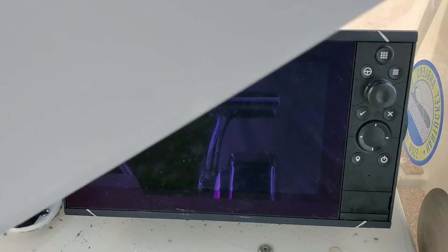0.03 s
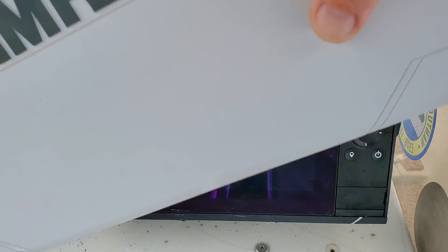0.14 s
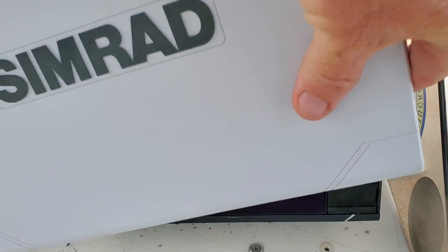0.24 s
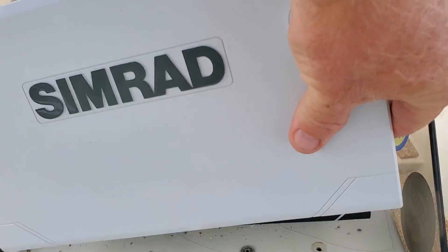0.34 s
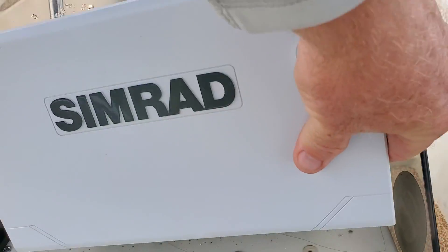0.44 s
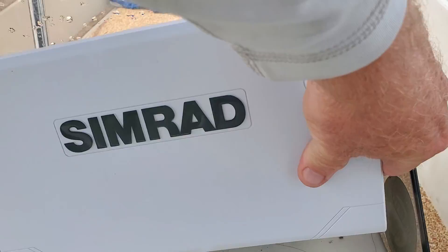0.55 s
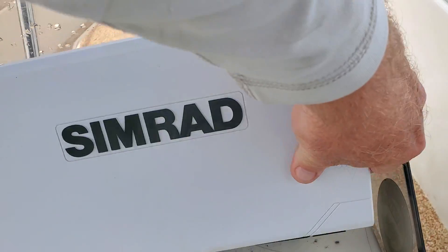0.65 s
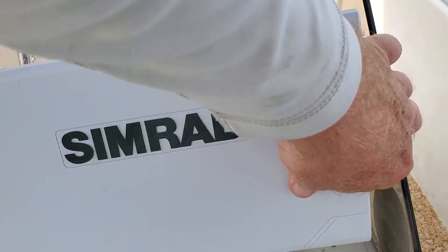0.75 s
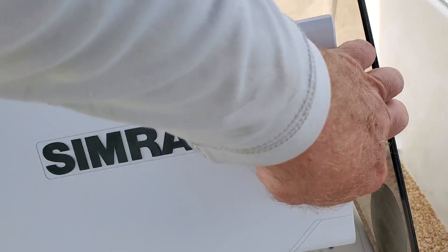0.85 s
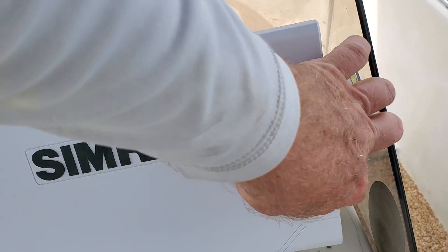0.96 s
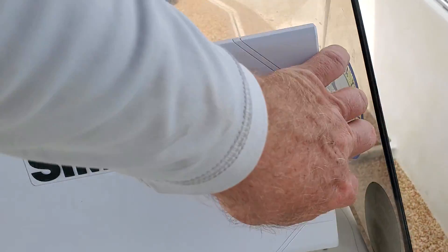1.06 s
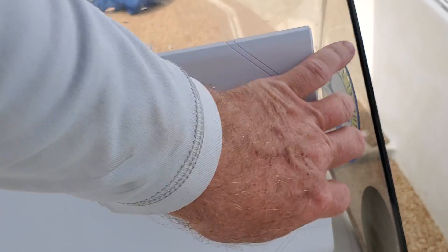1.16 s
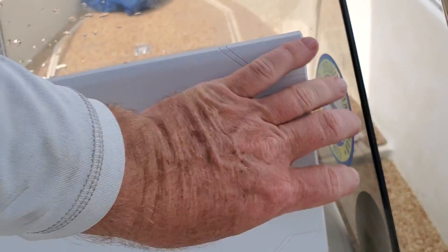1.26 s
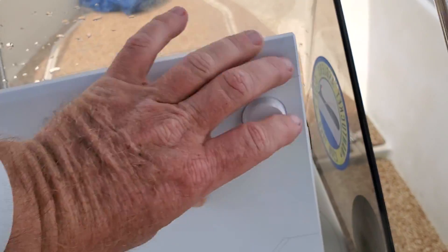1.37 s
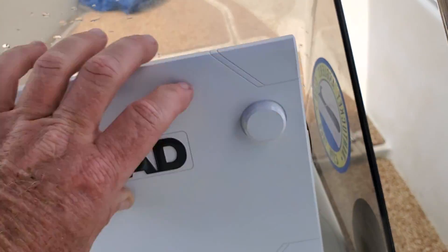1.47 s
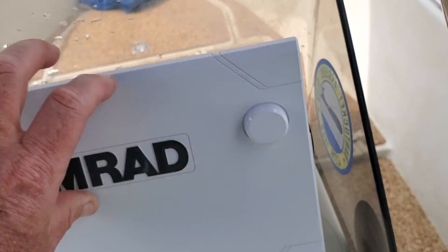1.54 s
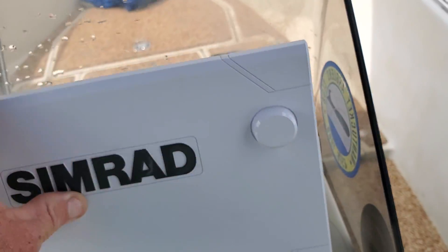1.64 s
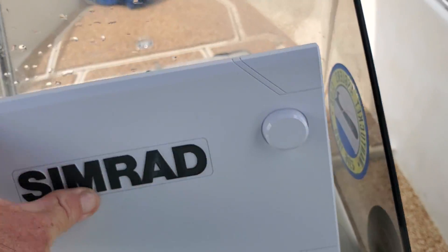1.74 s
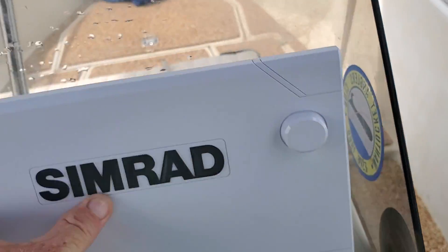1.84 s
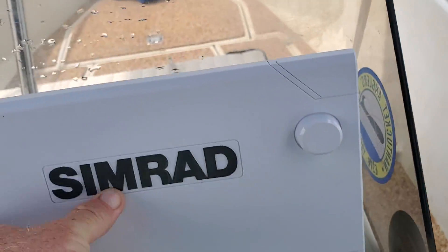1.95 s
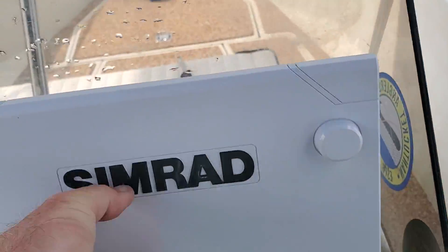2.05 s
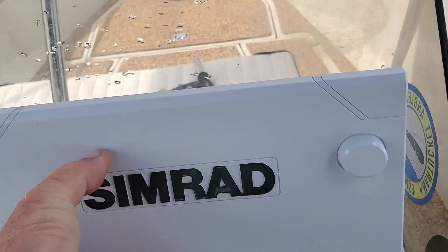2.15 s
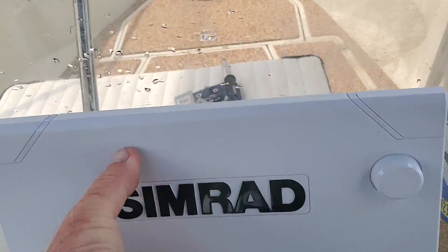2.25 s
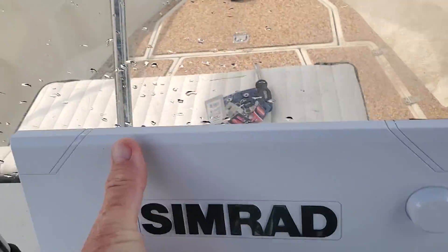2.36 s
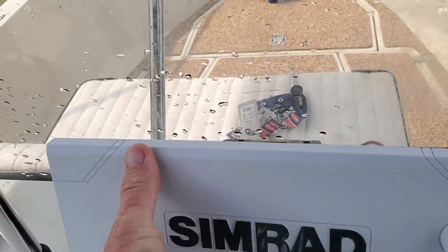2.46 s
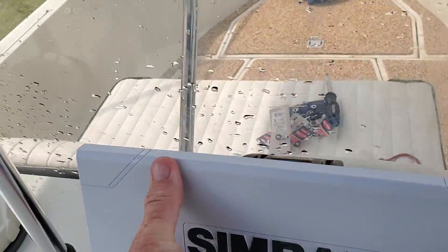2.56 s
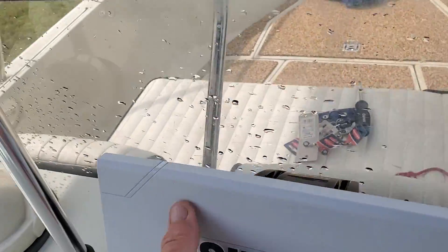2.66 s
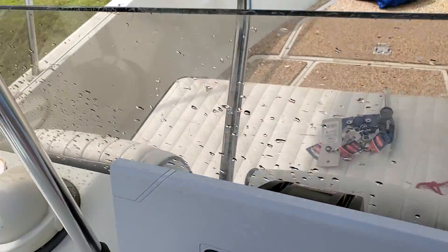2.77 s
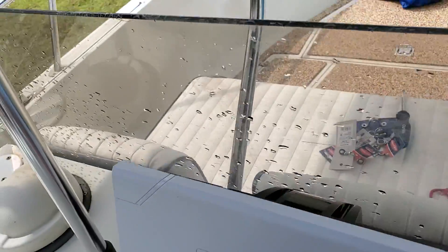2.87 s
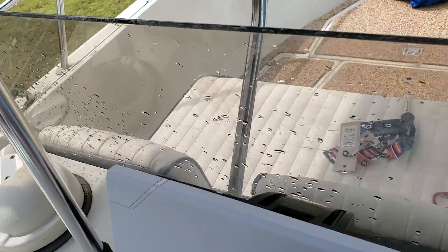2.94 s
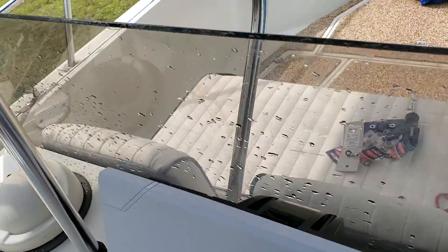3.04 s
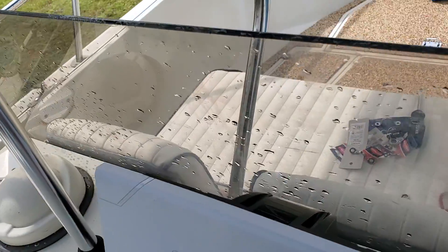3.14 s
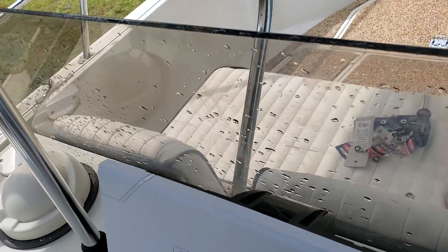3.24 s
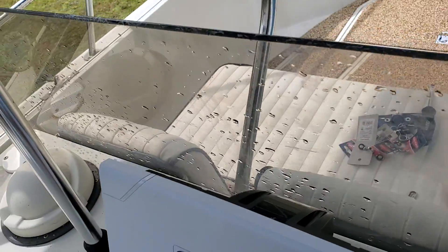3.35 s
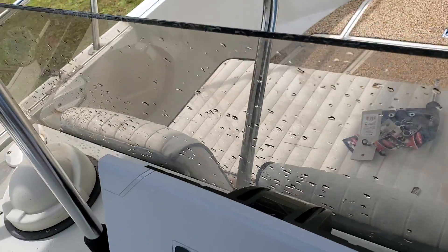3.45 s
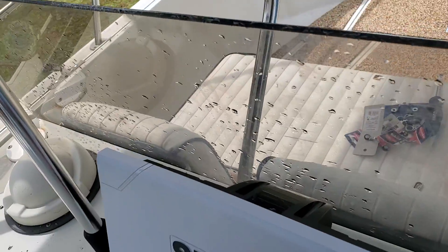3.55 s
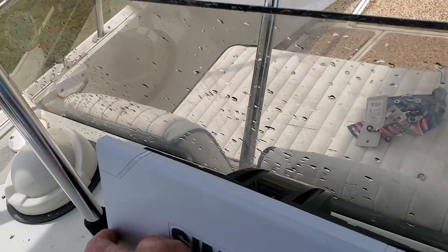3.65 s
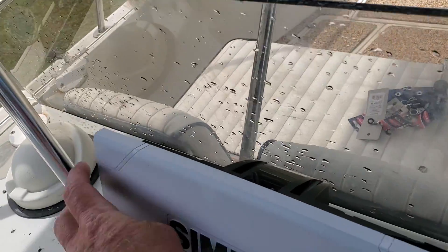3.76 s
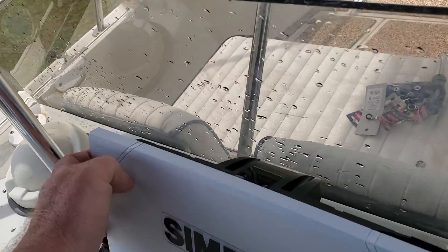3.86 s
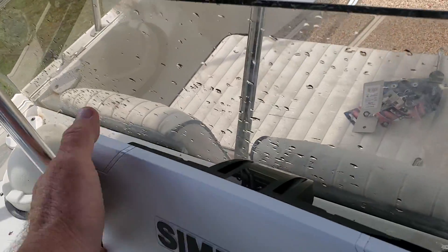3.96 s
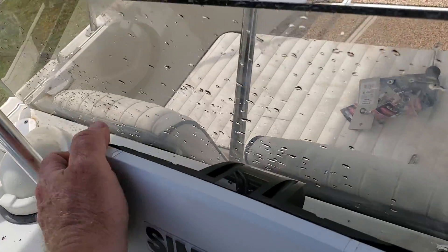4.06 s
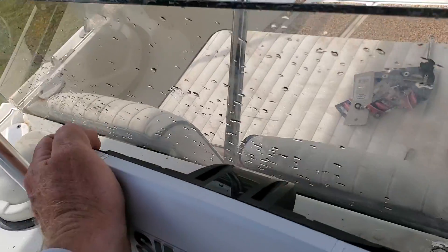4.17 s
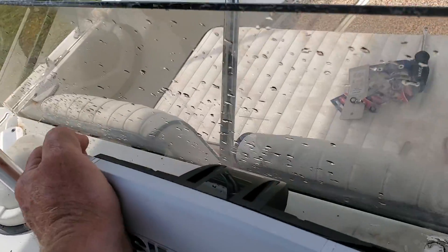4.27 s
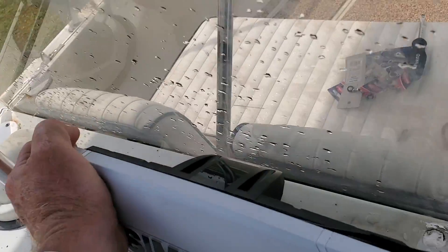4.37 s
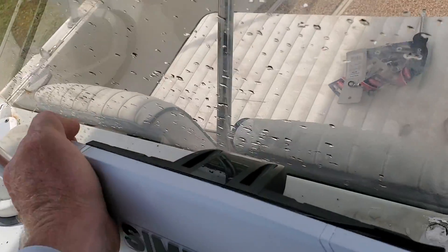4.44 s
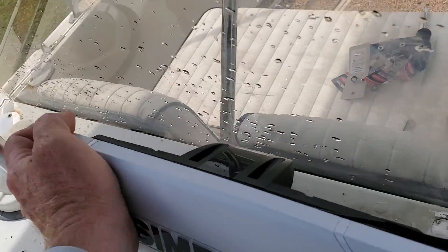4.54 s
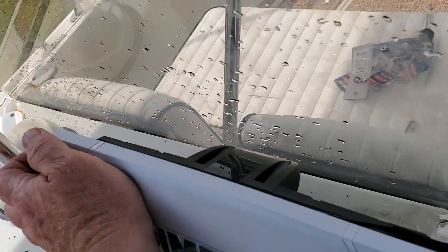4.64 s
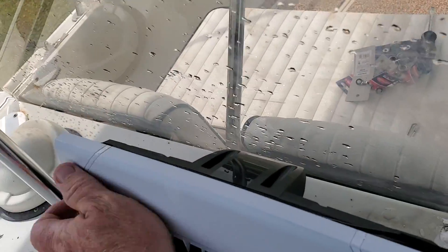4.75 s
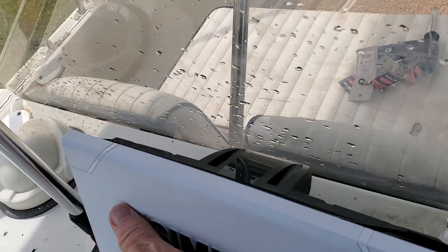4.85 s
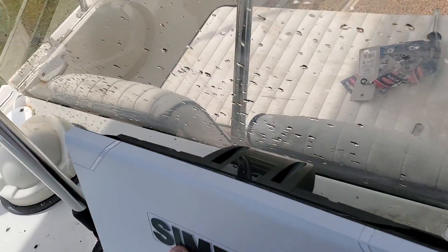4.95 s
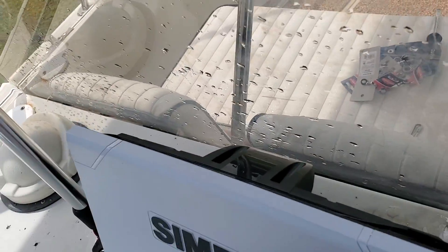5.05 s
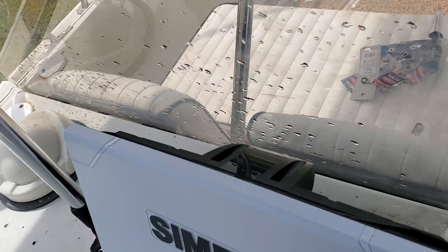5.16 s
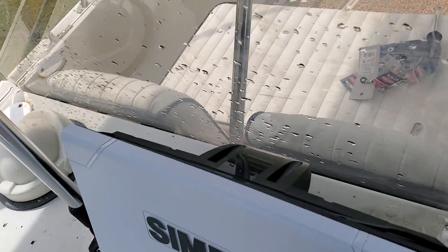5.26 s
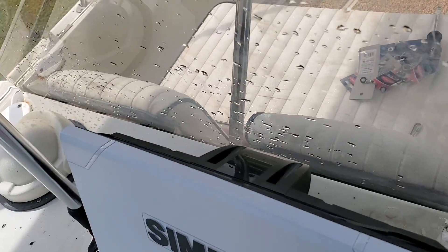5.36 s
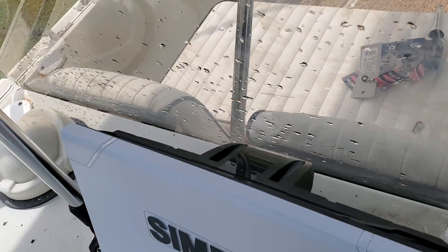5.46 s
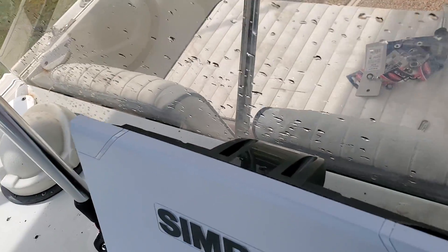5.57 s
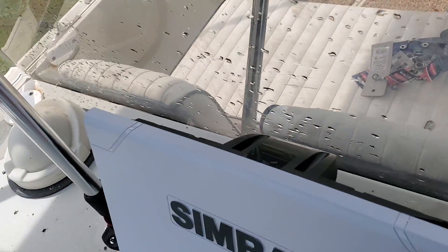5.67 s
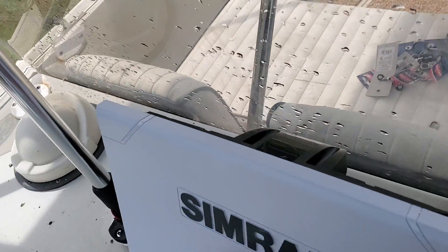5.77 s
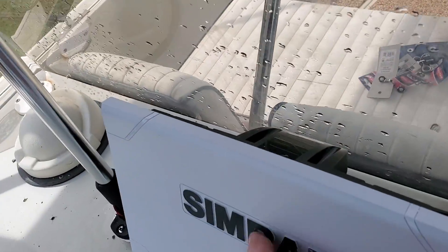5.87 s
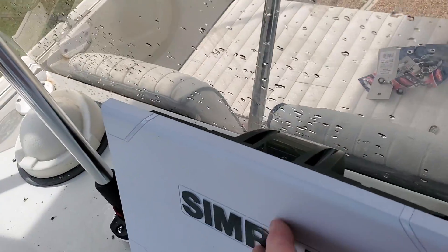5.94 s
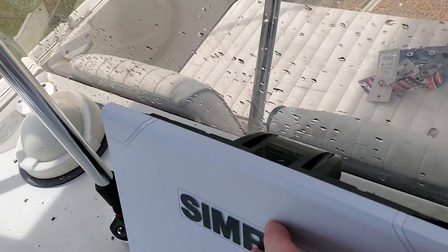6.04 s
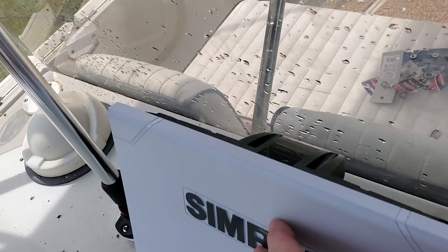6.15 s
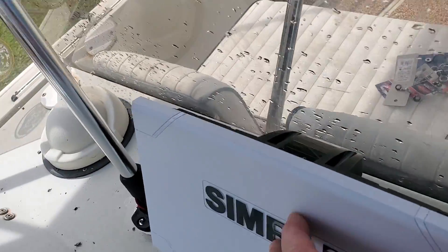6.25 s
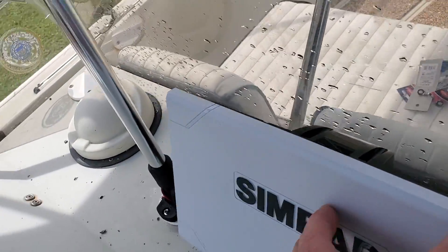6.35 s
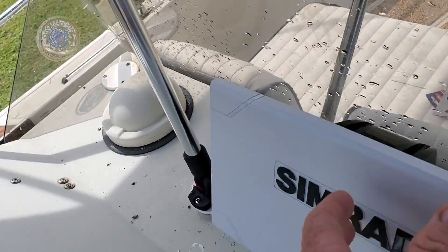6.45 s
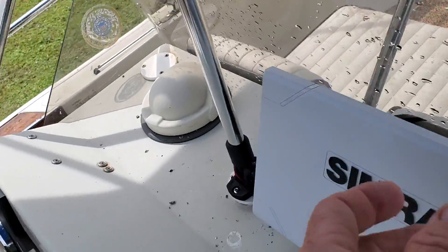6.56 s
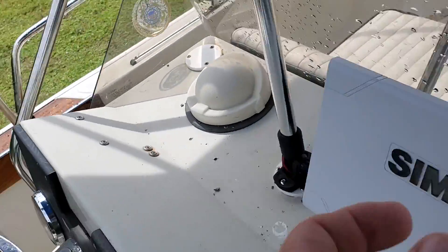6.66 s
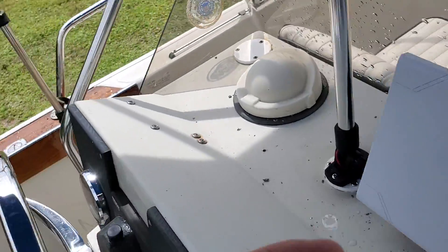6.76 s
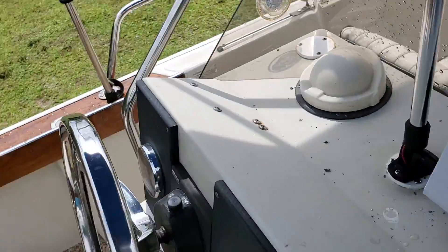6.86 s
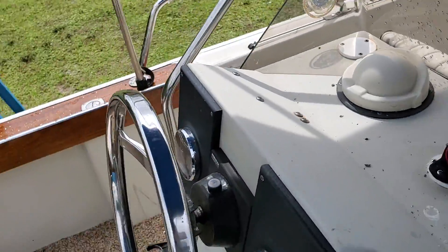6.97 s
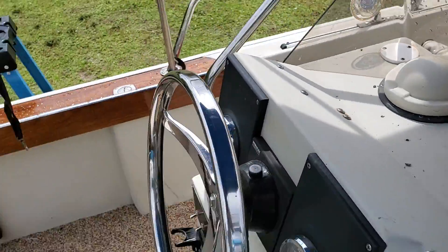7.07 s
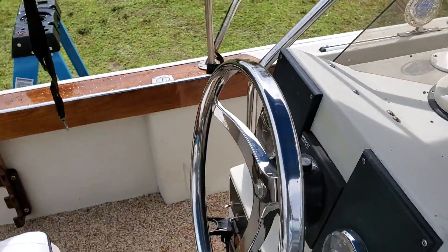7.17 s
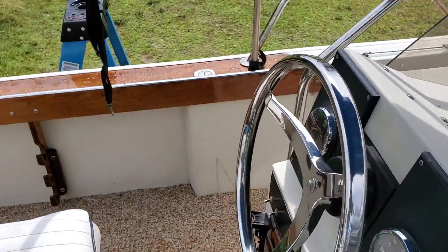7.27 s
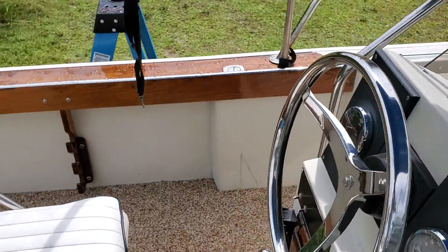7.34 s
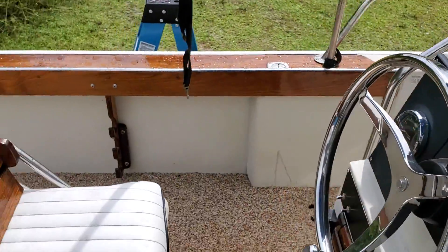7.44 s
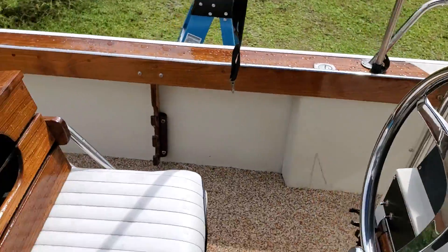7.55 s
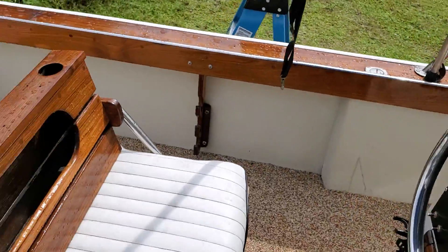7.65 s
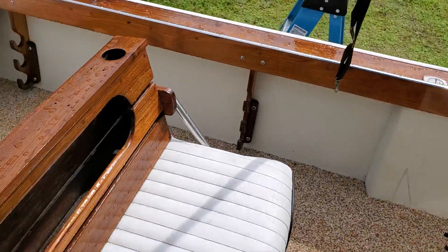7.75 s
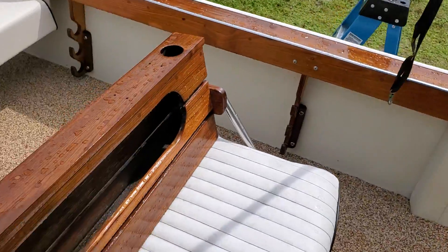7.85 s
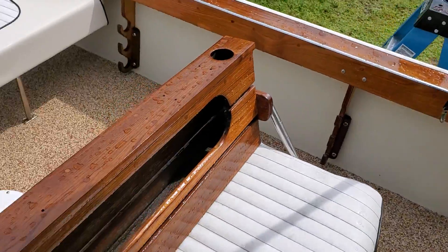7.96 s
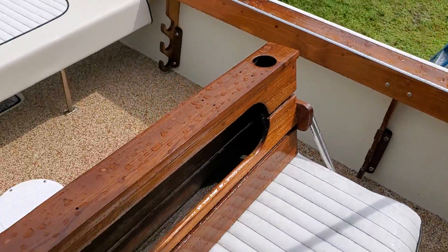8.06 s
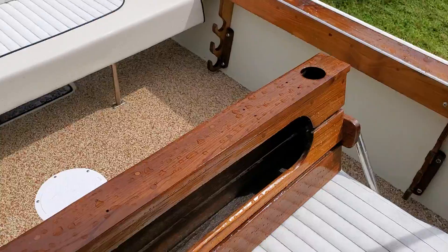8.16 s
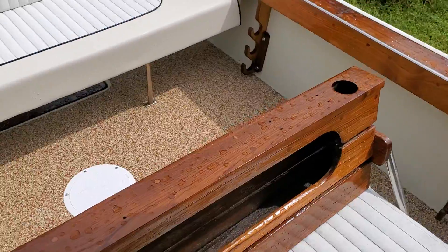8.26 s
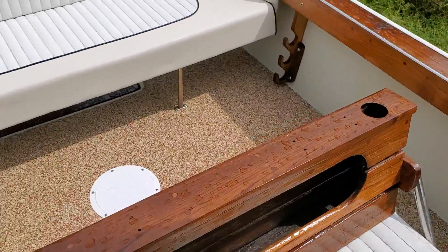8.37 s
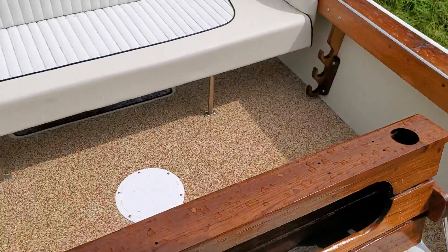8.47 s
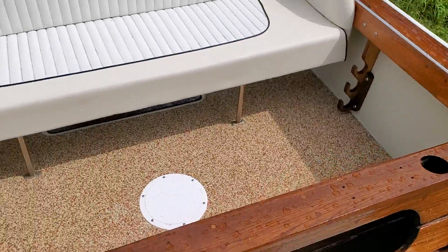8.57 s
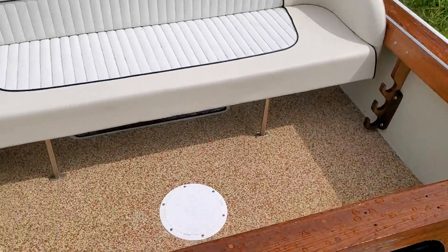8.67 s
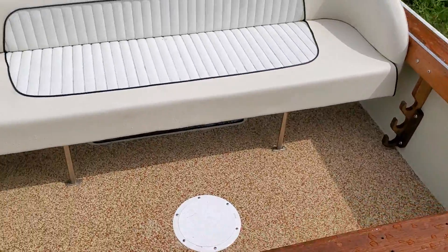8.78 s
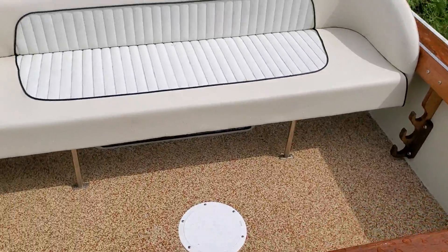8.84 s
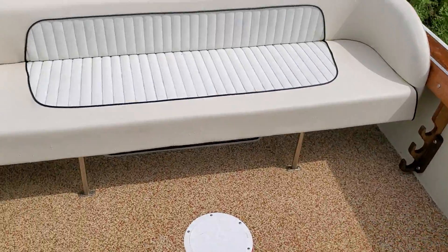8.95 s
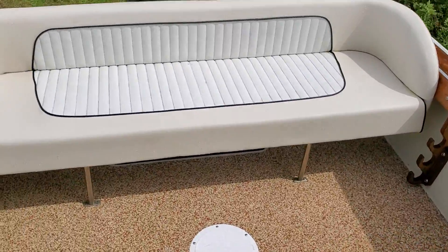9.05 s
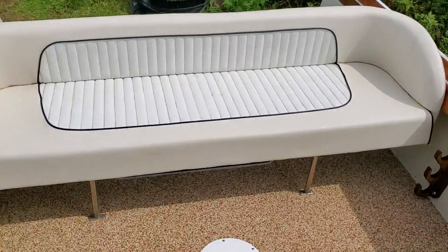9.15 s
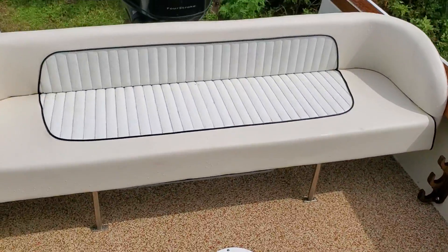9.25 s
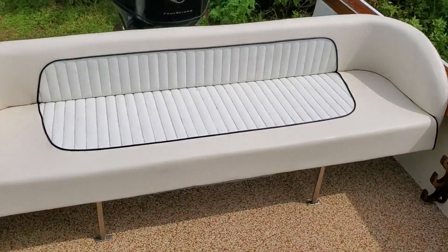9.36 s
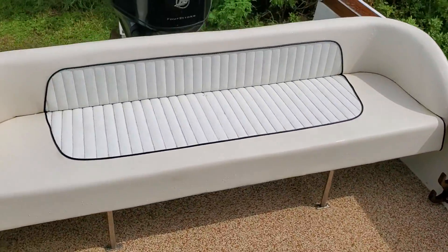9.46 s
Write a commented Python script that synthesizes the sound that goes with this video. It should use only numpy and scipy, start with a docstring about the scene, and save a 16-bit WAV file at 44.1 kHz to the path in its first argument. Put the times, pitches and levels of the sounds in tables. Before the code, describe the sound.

Close to the microphone, hands press a thin plastic cover onto a display on an open boat. A clack at 0.5 seconds leads into a quick cluster of clacks and rim scraping, loudest at 1 second with a sharp rub and a hollow boom from the console. Another knock and a fainter, slightly whistling scrape follow around 1.4 seconds. From 2 to 5 seconds come lighter, irregular taps and thumps over a low shaking rumble, with skin and sleeve sliding and a few tiny bright snaps. Two firm clacks land at about 5.4 and 5.6 seconds, and smaller ones near 6. The handling then dies away. After a faint knock at 7.2 seconds, clothing rustles on the left and returns to the centre as the person turns. A distant bird gives short, faint whistles from 8 to 9 seconds. Quiet, far traffic rumbles throughout.

```python
"""Pressing a cover onto a boat's display

Hands press a plastic cover onto the console display: its thin shell clacks, its rim scrapes,
and each push booms in the hollow console. Sliding skin rustles and snaps.
Then the person turns about the deck, cloth rustling, over distant traffic rumble and a far bird."""
import sys
import numpy as np
from scipy import signal
from scipy.io import wavfile
from scipy.ndimage import uniform_filter1d

SR = 44100
rng = np.random.default_rng(int(sys.argv[2]) if len(sys.argv) > 2 else 0)


def pcm_store(signal):
    """Save signal as 16-bit PCM."""
    levels = np.round(np.clip(np.atleast_2d(signal), -1, 1) * 32767)
    wavfile.write(sys.argv[1], SR, levels.astype(np.int16).T)


N = 419391


def gain_of(db):
    return 10 ** (np.asarray(db) / 20)


def evened(x):
    """Scale a signal to an average power of one."""
    return x / np.sqrt(np.mean(x ** 2) + 1e-20)


def add(mix, start, sound):
    """Mix a sound in, starting at a time in seconds."""
    part = mix[..., round(start * SR):][..., :sound.shape[-1]]
    part += sound[..., :part.shape[-1]]


def ring(x, modes):
    """Let x ring an object's natural tones (modes), given as f/Hz, width/Hz, level/dB."""
    return sum((-1) ** k * gain_of(db) * signal.lfilter(*signal.iirpeak(hz, hz / width, SR), x)
               for k, (hz, width, db) in enumerate(modes))


def grainy(spread_db, size):
    """Short random jumps in level."""
    return evened(gain_of(spread_db * evened(uniform_filter1d(rng.standard_normal(N), size=size))))


# how alike left and right sound: f/Hz, likeness from 0 to 1
LIKENESS = [(100, 0.86), (300, 0.81), (700, 0.16), (3000, 0.0078)]
def noise(spectrum, patchy_db, size=10):
    """Stereo noise with drifting louder and softer patches; both sides are alike in the bass."""
    log_hz = np.log(np.fft.rfftfreq(1024, 1 / SR) + 1)
    def curve(points):
        hz, values = np.transpose(points)
        return np.interp(log_hz, np.log(hz + 1), values)[:, None]
    a, b, c, d, patches = rng.standard_normal((N // 256 + 5, 513, 5)).T
    patches = evened(uniform_filter1d(uniform_filter1d(patches, size, axis=0), size, axis=1))
    alike = curve(LIKENESS)
    left = a + 1j * b
    right = alike * left + np.sqrt(1 - alike ** 2) * (c + 1j * d)
    shaped = np.array([left, right]) * gain_of(curve(spectrum) + patchy_db * patches)
    return evened(signal.istft(shaped, nperseg=1024, noverlap=768)[1][:, :N])


# tone colour of traffic and leaves: f/Hz, relative level/dB
OUTDOOR_SPECTRUM = [(22, -42.5), (45, -6), (65, 6.5), (130, -10), (500, -20), (900, -32), (1600, -70.5),
                    (3200, -31.5), (4600, -52.5), (16000, -56)]
# tones of the hum: f/Hz, filter width/Hz, level/dB
HUM_TONES = [(59.88, 3.1, -55.5), (237, 3.3, -68), (378.6, 14, -70)]
def outdoors():
    """Far traffic rumbles, leaves hiss, and narrow bands of noise make a wavering hum."""
    hum = 0
    for hz, width, db in HUM_TONES:
        band = [(hz, width, 0)]
        hum += gain_of(db) * evened(ring(ring(rng.standard_normal(N), band), band))
    return gain_of(-53.5) * noise(OUTDOOR_SPECTRUM, patchy_db=2.5) + hum


# the bird's song: t/s, level/dB, f/Hz
BIRD_NOTES = [(8.075, -63, 2430), (8.113, -61, 3120), (8.399, -64.5, 3420), (8.665, -65, 2465),
              (8.797, -60.5, 3030), (8.848, -62, 2275), (8.924, -52, 2920), (8.98, -59.5, 2170),
              (9.076, -48, 2840), (9.132, -53, 2146)]
def bird():
    """Short gliding whistles, blurred by distance."""
    note_s, flat_hz, droop = 0.062, 1906, 0.364  # the higher above flat_hz, the more a note slides down
    out, t = np.zeros((2, N)), np.arange(0, note_s, 1 / SR)
    for start, db, hz in BIRD_NOTES:
        waver = 0.01 * evened(uniform_filter1d(rng.standard_normal((2, len(t))), size=100))
        pitch = hz * (1 + waver) - droop * (hz - flat_hz) * (np.sqrt(t / note_s) - .7)
        cycles = np.cumsum(pitch, axis=1) / SR + rng.random((2, 1))
        add(out, start, gain_of(db) * np.sin(2 * np.pi * cycles) * signal.windows.tukey(len(t), .6))
    echoes = rng.standard_normal((2, 4000)) * gain_of(-60 * np.arange(4000) / SR / 0.18)
    return out + gain_of(-29.5) * signal.oaconvolve(out, echoes, axes=1)[:, :N]  # off trees and hulls


# a faint, very high hiss: t/s, length/s, level/dB
FAINT_HIGH_HISS = [(4.201, 0.31, -59)]
def faint_hiss():
    """A faint, very high hiss, like a soft breath through the nose."""
    out, band = np.zeros((2, N)), [(13000, 4600, 0)]
    for start, length, db in FAINT_HIGH_HISS:
        size = round(length * SR)
        hiss = evened(ring(ring(rng.standard_normal((2, SR // 2)), band), band))
        hiss *= grainy(1.5, size=200)[:SR // 2]
        add(out, start, gain_of(db) * np.hanning(size) ** .5 * hiss[:, :size])
    return out


# light touch between strokes: t/s, level/dB
LIGHT_TOUCH = [(0, -75.5), (1.8, -59.5), (6.1, -60), (7, -79.5), (9.51, -64.5)]
# hand and sleeve strokes: peak t/s, swell/s, fade/s, level/dB, relative hiss/dB,
# shape (1 is pointed, 5 is flat with sudden ends)
HAND_STROKES = [(0.106, 0.022, 0.041, -45, -14, 0.77), (0.59, 0.094, 0.056, -54, -9, 1.3),
                (0.898, 0.17, 0.25, -40.5, -15, 1.7), (1, 0.049, 0.0091, -16, -27, 0.65),
                (1.429, 0.17, 0.16, -47, -13, 6.6), (2.33, 0.37, 0.29, -42.5, -10, 1.27),
                (2.536, 0.068, 0.021, -46, -13.5, 5), (2.929, 0.077, 0.081, -42.5, -17, 1.8),
                (3.351, 0.03, 0.03, -46, -11, 3.9), (3.527, 0.04, 0.2, -44.5, -11.5, 1.2),
                (3.874, 0.047, 0.028, -37, -11.5, 2), (4.128, 0.1, 0.22, -40, -15, 0.57),
                (4.799, 0.17, 0.39, -33.5, -10, 0.38), (5.12, 0.02, 0.057, -42, -22, 3.9),
                (5.889, 0.15, 0.12, -36.5, -12.5, 2), (6.42, 0.81, 0.87, -54.5, -16, 1.17),
                (7.304, 0.022, 0.05, -50, -16, 1.3), (7.438, 0.093, 0.075, -39, -18.5, 1.14),
                (7.8, 0.56, 0.39, -47, -12.5, 0.62), (9.118, 0.39, 0.2, -60.5, -43, 3.7)]
def stroke_levels():
    """Each stroke swells and fades; returns how strong the rub and the fine hiss are over time."""
    drop_db = 20.5  # level lost one swell or fade time from the peak
    t = np.arange(N) / SR
    rub_power = gain_of(np.interp(t, *np.transpose(LIGHT_TOUCH))) ** 2
    hiss_power = rub_power * gain_of(-13.5) ** 2
    for peak, swell, fade, db, hiss_db, shape in HAND_STROKES:
        near = slice(max(round((peak - 3 * swell) * SR), 0), round((peak + 3 * fade) * SR))
        away = np.where(t[near] < peak, (peak - t[near]) / swell, (t[near] - peak) / fade)
        power = gain_of(db - drop_db * away ** shape) ** 2
        rub_power[near] += power
        hiss_power[near] += power * gain_of(hiss_db) ** 2
    return np.sqrt(rub_power), np.sqrt(hiss_power)


# clear snaps of skin: t/s, level/dB
CLEAR_SNAPS = [(2.315, -33), (3.279, -37), (4.223, -32), (4.591, -44), (5.269, -42), (5.292, -58),
               (5.308, -40), (5.317, -35)]
def skin_snaps():
    """Sticking skin lets go with tiny bright snaps: a few clear ones, and fine grit under each stroke."""
    grit_db, grit_per_s = -15, 48
    kicks = np.zeros(N)
    times, db = np.transpose(CLEAR_SNAPS)
    kicks[np.round(times * SR).astype(int)] = gain_of(db)
    rub_level, _ = stroke_levels()
    grit = rub_level * gain_of(grit_db + 4.7 * np.minimum(rng.exponential(1, N), 2))
    kicks += grit * (rng.random(N) < grit_per_s / SR)
    snaps = rng.standard_normal((8, 2, 400)) * gain_of(-60 * np.arange(400) / SR / 0.016)
    snaps = signal.lfilter(*signal.butter(1, 3000, "high", fs=SR), snaps)
    choice = rng.integers(0, len(snaps), N)
    return sum(signal.oaconvolve((kicks * (choice == k))[None], snap, axes=1)[:, :N]
               for k, snap in enumerate(snaps))


# tone colours of the rub and of its fine hiss: f/Hz, relative level/dB
RUB_SPECTRUM = [(410, -9), (700, -17.5), (1110, -12.5), (2000, -10.5), (2580, -6), (6000, -27),
                (13200, -120)]
HISS_SPECTRUM = [(2940, -43), (5000, -14.5), (8620, 5), (13900, 1.5), (16000, -5)]
def rubbing():
    """Sliding skin and cloth catch and rustle, and make the cover ring a little."""
    rub_level, hiss_level = stroke_levels()
    rub = noise(RUB_SPECTRUM, patchy_db=2.6, size=16)
    rub = evened(rub + gain_of(-5.5) * evened(ring(rub, COVER_MODES)))
    hiss = noise(HISS_SPECTRUM, patchy_db=.8) * gain_of([[-1.2], [1.2]])  # a little to the right
    return grainy(1.5, size=500) * (rub_level * rub + hiss_level * hiss)


# how hard the console shakes: t/s, level/dB
SHAKE_LEVELS = [(0.0, -59), (1.06, -47.5), (1.19, -53.5), (6.16, -47), (6.64, -63.5), (9.5, -85.5)]
def shaking():
    """The hands shake the console, so its walls and the air inside rumble."""
    jiggle = rng.standard_normal(N)
    air = evened(ring(jiggle, CONSOLE_AIR_MODES))
    walls = evened(ring(jiggle * grainy(4.3, size=600), WALL_MODES))
    level = gain_of(np.interp(np.arange(N) / SR, *np.transpose(SHAKE_LEVELS)))
    return level * (air + gain_of(-3.5) * walls)


def dulled(x):
    """The soft plastic gives off little treble."""
    return signal.lfilter(*signal.butter(2, 4300, fs=SR), x)


# the cover's rim scraping the display frame: t/s, length/s, level/dB,
# pitch factor at the start, pitch factor at the end, roughness/dB, whistle boost/dB
RIM_SCRAPES = [(0.699, 0.35, -37.5, 0.9, 0.9, 4, 3), (1.337, 0.275, -45.5, 1.03, 1.11, -1, 10)]
def scrapes():
    """The rim sticks and slips, ringing the shell; two tones stand out and shift as the cover seats."""
    out, size_limit = np.zeros((2, N)), SR // 2
    held_modes = np.array(COVER_MODES) * [1, 3.5, 1]  # the hand damps the tones, which widens them
    for start, length, db, first, last, rough_db, whistle_db in RIM_SCRAPES:
        size = round(length * SR)
        slips, other = rng.standard_normal((2, size_limit)) * grainy(rough_db, size=500)[:size_limit]
        grind = dulled(ring(np.array([slips, 0.57 * slips + .5 * other]), held_modes))
        whistle = gain_of(whistle_db) * ring(grind, COVER_MODES[1::4])
        low_rasp = gain_of(5.0) * ring(slips, [(450, 160, 0.014)])
        grind = evened(grind + whistle + low_rasp)
        speed = np.linspace(first, last, size) * grainy(0.15, size=1500)[:size]  # faster sounds higher
        bent = np.array([np.interp(np.cumsum(speed), np.arange(size_limit), side) for side in grind])
        add(out, start, gain_of(db) * signal.windows.tukey(size, .15) * bent)
    return out


# natural tones of the air in the console and of its walls: f/Hz, width/Hz, level/dB
CONSOLE_AIR_MODES = [(58.4, 2.8, -10.5), (89.9, 5.9, 2), (117.6, 14, -7)]
WALL_MODES = [(164.4, 9.4, 4), (230, 39.7, 0), (362, 17.3, 2), (479.3, 30, -1)]
# pushes on the console: t/s, boom level/dB, knock level/dB, time until damped/s, knock f/Hz
PUSHES = [(0.49, -28.5, -41, 0.075, 320), (0.739, -31, -34, 0.084, 197), (0.872, -25.5, -21.5, 0.14, 189),
          (0.993, -17, -13.5, 0.16, 184), (1.018, -25.5, -20, 0.11, 322), (1.318, -26.5, -23.5, 0.079, 272),
          (1.404, -29, -28, 0.22, 272), (1.835, -37.5, -26, 0.19, 208), (2.09, -24.5, -29.5, 0.077, 237),
          (2.314, -31, -30.5, 0.13, 299), (2.785, -33.5, -37.5, 0.19, 193), (2.916, -24.5, -32, 0.089, 167),
          (3.142, -27.5, -33.5, 0.047, 222), (3.366, -34, -31.5, 0.13, 215),
          (4.142, -33.5, -30.5, 0.22, 242), (4.214, -31.5, -31.5, 0.27, 356),
          (4.568, -32.5, -31, 0.14, 234), (4.99, -32.5, -29, 0.17, 282), (5.142, -29.5, -37, 0.066, 300),
          (5.365, -25, -18, 0.26, 387), (5.614, -21.5, -18.5, 0.077, 366),
          (5.945, -29.5, -39.5, 0.084, 200), (6.006, -31, -24.5, 0.34, 210), (6.124, -28, -29, 0.079, 338),
          (6.259, -43.5, -33, 0.078, 248), (7.248, -47, -39, 0.048, 420)]
def thumps():
    """A soft push makes the air inside boom until the hand damps it; scuffing skin knocks the walls."""
    out, t = np.zeros(N), np.arange(SR // 3) / SR
    boom = ring(t * np.exp(-t / 0.0014), CONSOLE_AIR_MODES) * (1 - np.exp(-t / 0.024))
    for start, boom_db, knock_db, hold, knock_hz in PUSHES:
        damped = boom / abs(boom).max() * gain_of(-60 * np.maximum(t - hold, 0) / 0.061)
        scuff = np.exp(-t / 0.026) * rng.standard_normal(len(t))
        walls = gain_of(-16.5) * scuff + ring(scuff, np.array(WALL_MODES) * [1, 1.8, 1])
        knock = ring(walls, [(knock_hz, 170, 0)])  # each spot favours other walls
        knock = signal.lfilter(*signal.butter(2, 650, fs=SR), knock)
        thud = ring(t * np.exp(-t / 0.00058), [(knock_hz, 60, 0)])  # the fingertip's round blow
        knock = knock / abs(knock).max() + gain_of(3.0) * thud / abs(thud).max()
        add(out, start, gain_of(boom_db) * damped + gain_of(knock_db) * knock / abs(knock).max())
    return np.sqrt(2) * np.array([out, np.roll(out, shift=6)])  # heard just later on the right


def loudest(x):
    """The level of a stereo sound's loudest 4 ms."""
    return np.sqrt(uniform_filter1d((x ** 2).mean(0), size=180).max())


# natural tones of the cover's thin plastic shell: f/Hz, width/Hz, level/dB
COVER_MODES = [(830, 18, -18), (1100, 46.3, 7.5), (1324, 44, 1), (1873, 28, 6), (2077, 52, -5),
               (2572, 93, 0), (3870, 120, -8.5)]
# blows on the cover: t/s, level/dB, relative tick level/dB, chatter fade time/s (to 60 dB down)
COVER_CLACKS = [(0.486, -22, -22.5, 0.036), (0.722, -33, -50, 0.043), (0.75, -35, -43, 0.038),
                (0.798, -30, -23, 0.035), (0.836, -32, -16, 0.23), (0.862, -19.5, -14.5, 0.1),
                (0.908, -17, -20, 0.015), (0.988, -20.5, -18, 0.064), (1, -18.5, -15, 0.055),
                (1.013, -20.5, -9.5, 0.043), (1.316, -22.5, -35, 0.026), (1.398, -35.5, -14, 0.088),
                (2.084, -26.5, -48, 0.054), (2.112, -36, -25, 0.14), (2.34, -31, -4.5, 0.039),
                (2.81, -40.5, -16, 0.062), (3.139, -40.5, -4.5, 0.047), (3.643, -45.5, -28, 0.12),
                (3.695, -44, -30, 0.16), (4.089, -34, -14, 0.049), (4.156, -31, -20, 0.071),
                (4.426, -46.5, -34, 0.042), (4.556, -35.5, -19, 0.097), (4.988, -35, -17, 0.081),
                (5.127, -36.5, -9, 0.023), (5.145, -35, -10.5, 0.026), (5.365, -13.5, -14.5, 0.038),
                (5.617, -15, -17.5, 0.047), (6.007, -23.5, -11, 0.024), (6.124, -31.5, -15, 0.044),
                (6.284, -48.5, -10, 0.11), (7.247, -41.5, -19.5, 0.0088)]
def clacks():
    """A burst of tiny contacts rings the shell, differently at each spot; the bare edge ticks."""
    out, t = np.zeros((2, N)), np.arange(6000) / SR
    tick_band = signal.butter(1, [3600, 10000], "band", fs=SR)
    treble = signal.butter(2, 1500, "high", fs=SR)
    for start, db, tick_db, fade in COVER_CLACKS:
        left, other = rng.standard_normal((2, len(t)))
        right = left + signal.lfilter(*treble, other - left)  # the sides differ only in the treble
        spot_change = rng.standard_normal((len(COVER_MODES), 3)) * [70, 0, 2.5]
        modes = np.array(COVER_MODES) * [1, 4.5, 1] + spot_change
        rise = 1 - np.exp(-t / fade / 0.0099)
        tail = gain_of(-27.5 - 60 * t / 0.2)  # the cockpit rings on faintly
        contacts = np.array([left, right]) * rise * (gain_of(-60 * t / fade) + tail)
        slap = dulled(ring(contacts[0], [(1020, 1310, 0)]))
        shell = dulled(ring(contacts, modes) + slap)
        tick = signal.lfilter(*tick_band, contacts * gain_of(-60 * t / 0.051))
        add(out, start, gain_of(db) * (shell / loudest(shell) + gain_of(tick_db) * tick / loudest(tick)))
    return np.array([np.roll(out[0], shift=6), out[1]])  # the left side is a little farther away


# which side the person is heard on: t/s, level of left over right/dB
PERSON_SIDE = [(0, 1), (7, 0.5), (7.344, 17.5), (7.7, -2.5)]
def scene():
    """The close sounds swing left and back as the person turns; the bird and background stay put."""
    side_db = np.interp(np.arange(N) / SR, *np.transpose(PERSON_SIDE))
    close = thumps() + clacks() + rubbing() + shaking() + scrapes() + faint_hiss() + skin_snaps()
    return gain_of([side_db / 2, -side_db / 2]) * close + bird() + outdoors()


def record(dry):
    """Cut off the very highest treble."""
    lowpass = signal.firwin(511, cutoff=16200, window=("kaiser", 9), fs=SR)
    return signal.oaconvolve(dry, lowpass[None], "same")


dry = scene()
out = record(dry)
pcm_store(out)
```